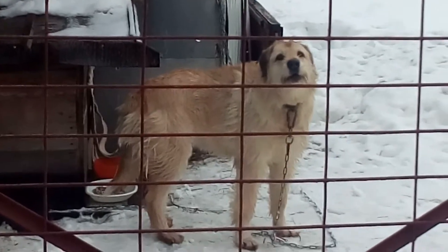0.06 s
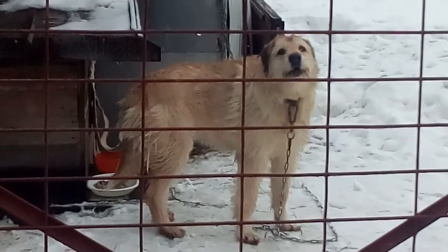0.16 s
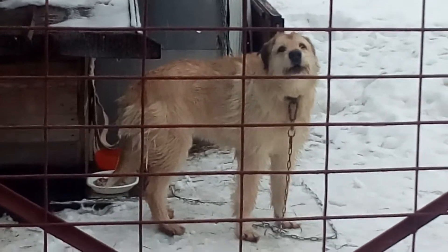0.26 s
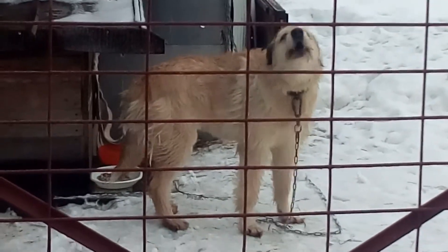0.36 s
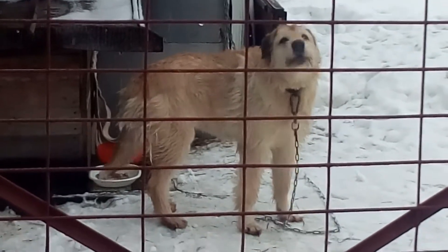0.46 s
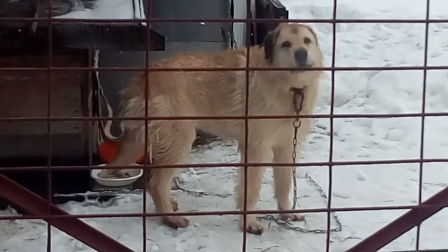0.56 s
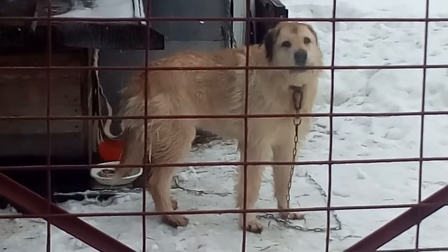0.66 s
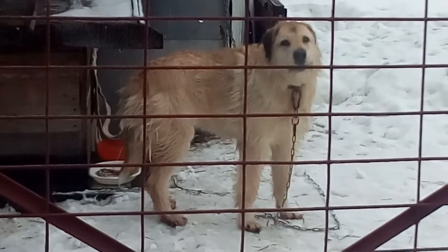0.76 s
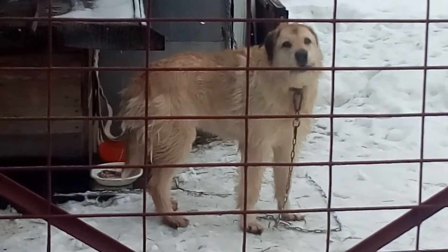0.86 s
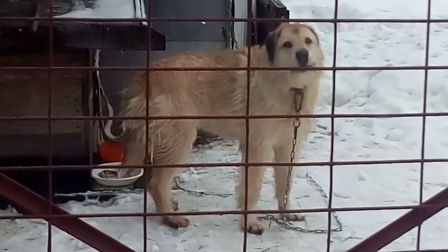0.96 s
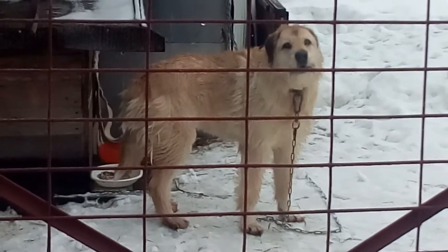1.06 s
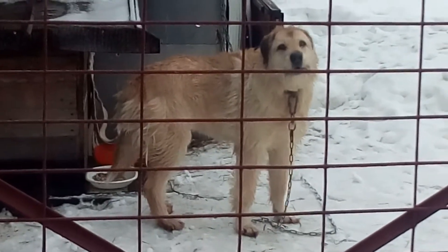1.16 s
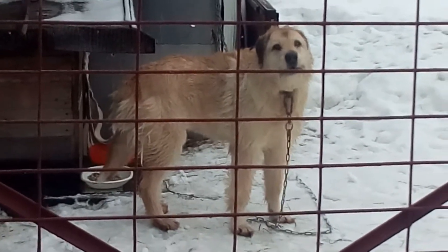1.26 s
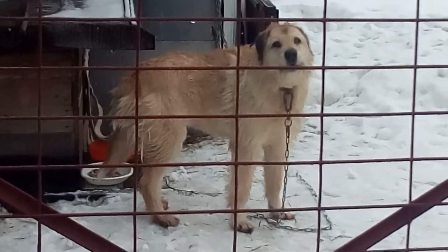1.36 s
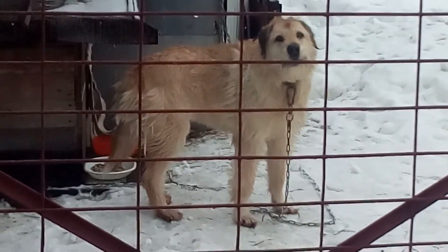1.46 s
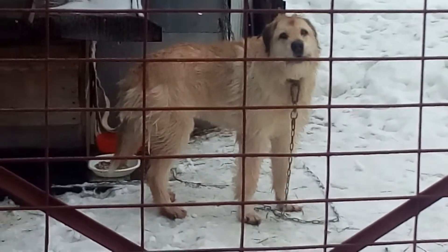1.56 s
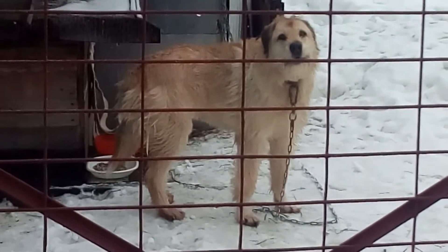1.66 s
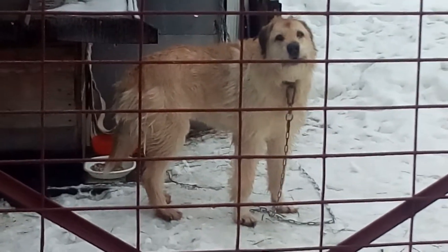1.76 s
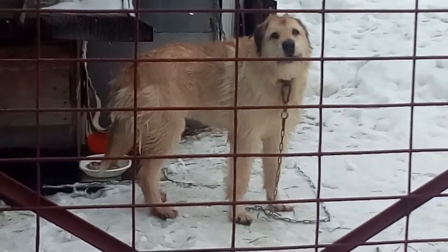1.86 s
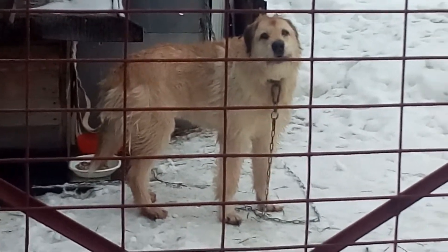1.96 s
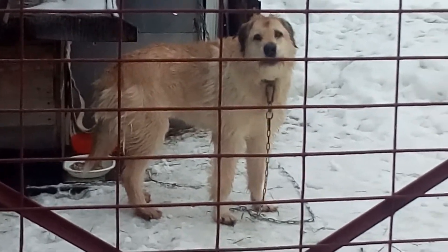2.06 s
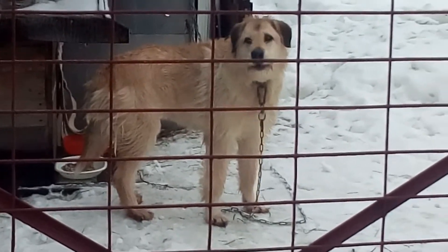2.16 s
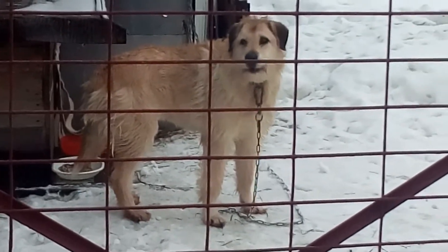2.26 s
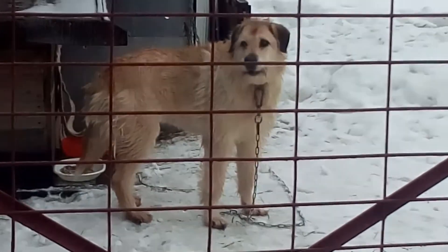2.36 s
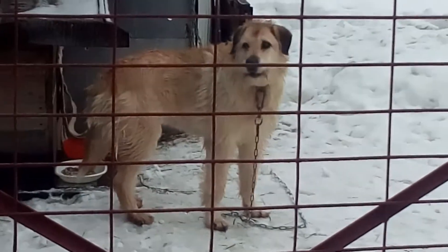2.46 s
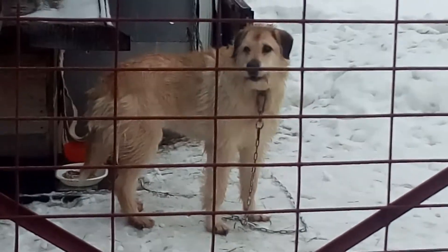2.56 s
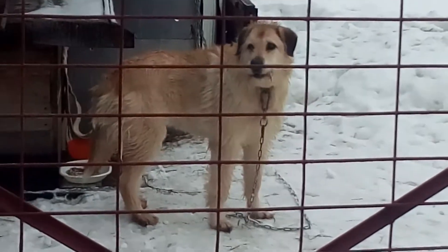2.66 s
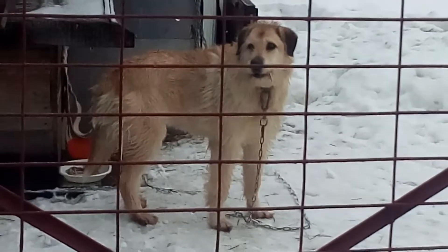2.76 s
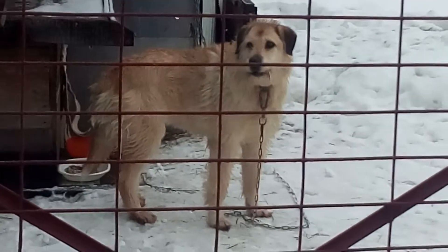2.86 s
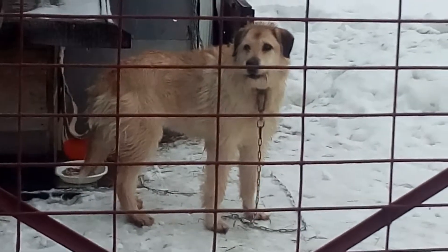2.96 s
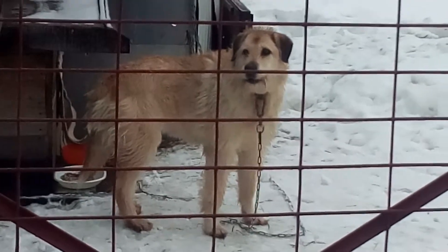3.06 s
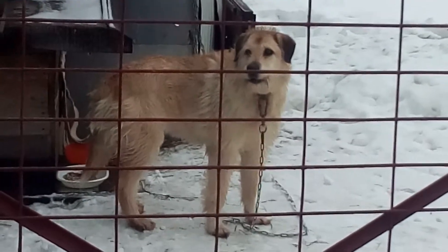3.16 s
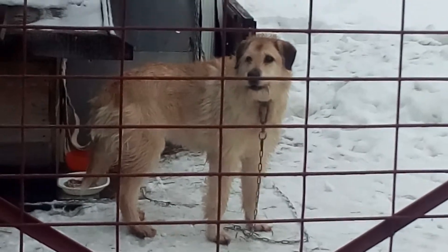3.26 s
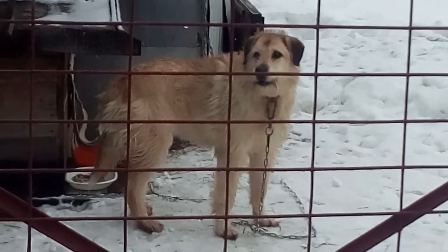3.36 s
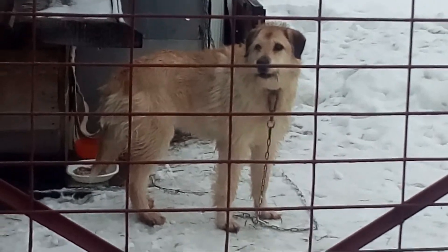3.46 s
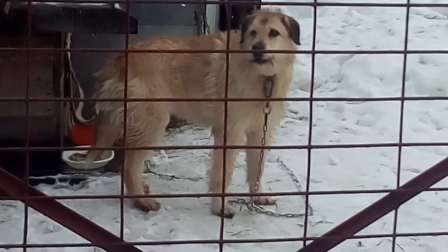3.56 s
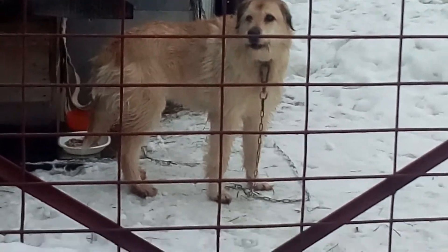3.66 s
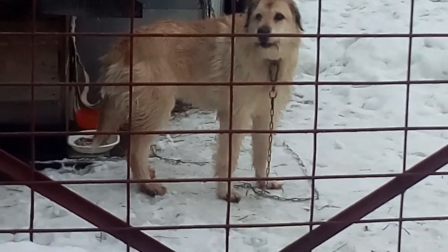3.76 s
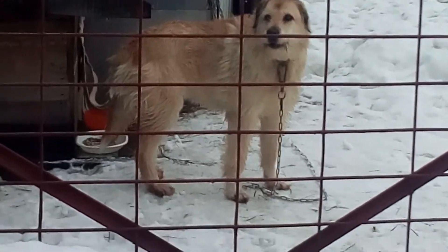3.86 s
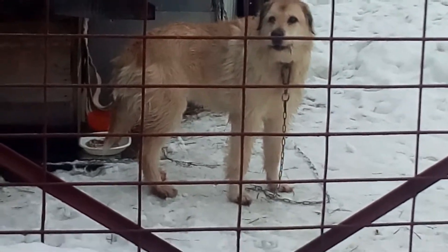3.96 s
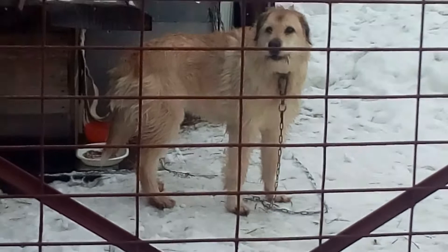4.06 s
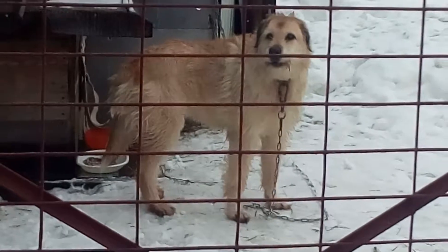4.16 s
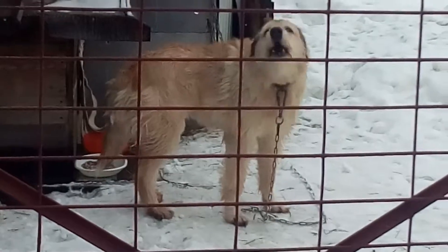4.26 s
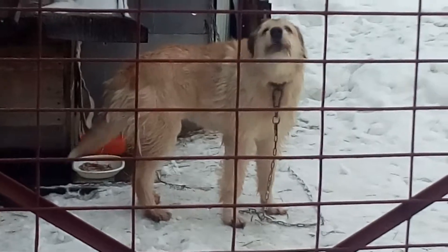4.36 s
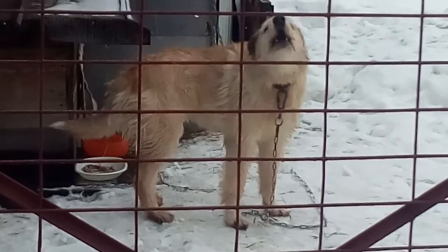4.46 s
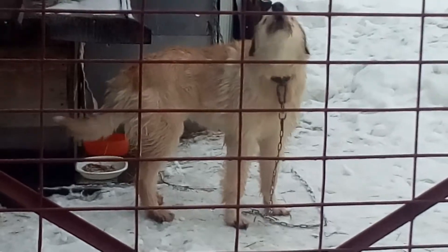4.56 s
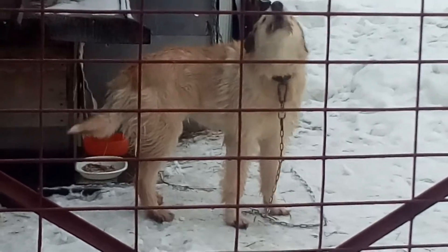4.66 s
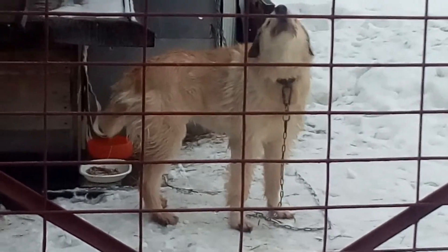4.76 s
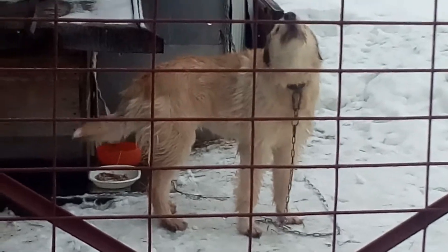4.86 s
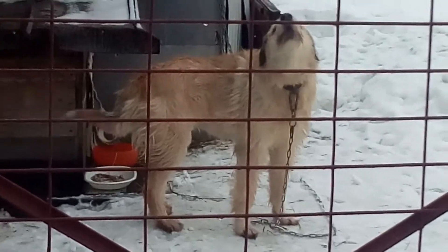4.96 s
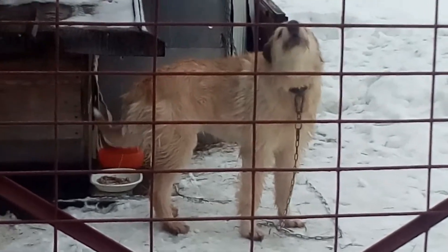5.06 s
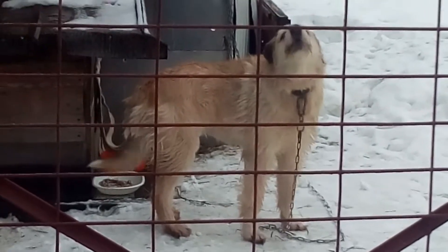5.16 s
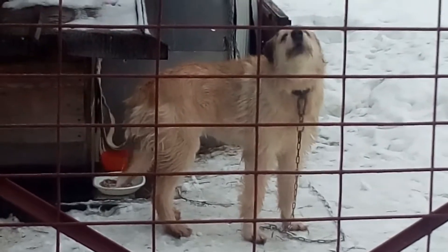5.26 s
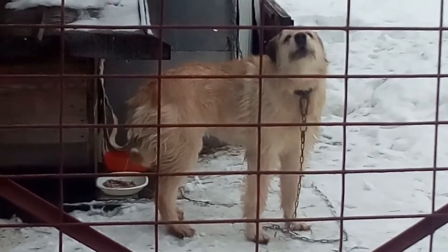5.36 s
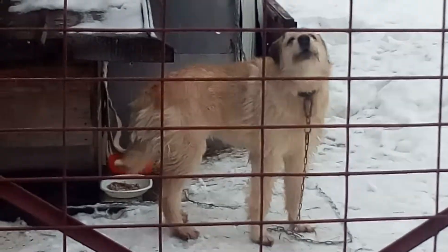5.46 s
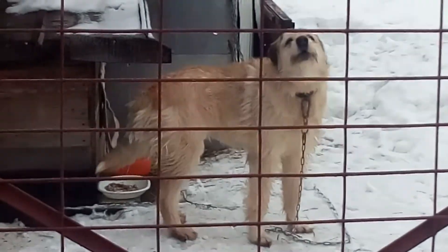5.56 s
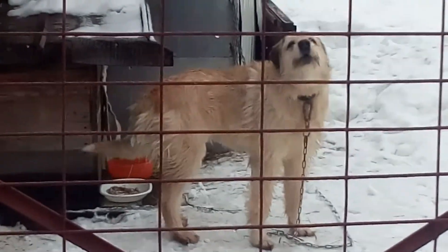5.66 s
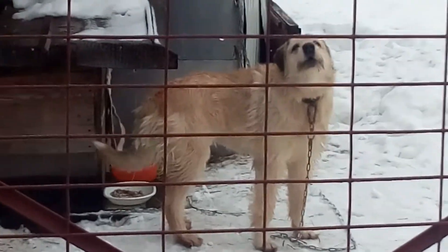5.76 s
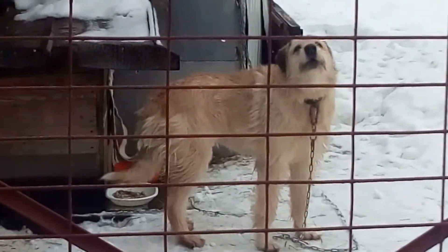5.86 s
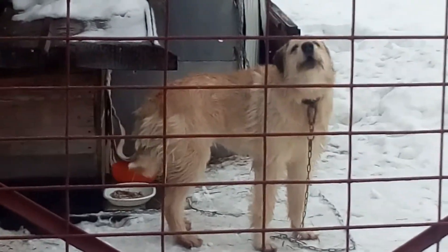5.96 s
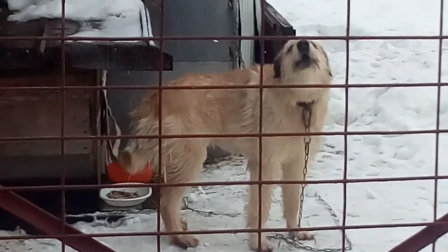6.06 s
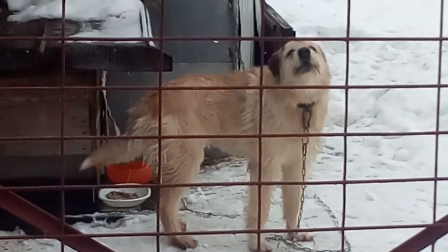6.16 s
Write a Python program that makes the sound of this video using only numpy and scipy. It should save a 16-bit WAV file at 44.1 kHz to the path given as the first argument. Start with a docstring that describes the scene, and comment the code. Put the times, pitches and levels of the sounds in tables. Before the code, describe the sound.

A quiet snowy yard with soft outdoor hush, low wavering rumble and a thin, steady whine around 1.2 kHz. A faint snow step and sparrow chirp come at 0.15 s, then at 0.3 s a large dog gives one short, loud, hoarse bark with a quick yard echo. Sparrows chirp in small clusters, mostly from 0.7 to 1.5 and 2.3 to 3.5 s, over light crunching snow. Very faint chesty grumbles pass at about 1.6 and 2.1 s. At 4.25 s the dog barks hard, and again at 4.5 s, this bark flowing into a howl that wobbles up and down in pitch until 5.0 s, then sinks into a low, rattling closed-mouth growl peaking near 5.3 s and fading. Crisper snow crunches fall at 4.9 and 5.4 s. A softer growl leads to one last sharp bark at 6.0 s, with a brief grumble after it.

```python
"""First comes an outdoor hush with a thin, slightly wavering whine, then a snow step and a chirp.
A big dog barks, grumbles, then barks twice into a wavering howl that sinks to a growl, and barks again.
The dog's voice is a stack of harmonics plus noise; growls are uneven clicks ringing muzzle and chest.
Snow steps are bursts of random grains, sparrows are short gliding whistles, and the whine is one tone.
Hush and low rumble are filtered noise; dying noise makes the echoes."""
import sys
import numpy as np
from scipy import signal
from scipy.fft import rfft, irfft, next_fast_len
from scipy.io import wavfile
from scipy.ndimage import uniform_filter1d

SR = 44100
rng = np.random.default_rng(int(sys.argv[2]) if len(sys.argv) > 2 else 0)


def store_pcm(level_fs):
    """Save levels as 16-bit WAV."""
    pcm = np.round(np.clip(level_fs, -1, 1) * 32767).astype(np.int16)
    wavfile.write(sys.argv[1], SR, np.atleast_2d(pcm).T)


N = 273772   # samples, about 6.2 s

# One bark per row: folds_catch_s, loudest_s, peak_db, swell_time_s, dying_time_s, swell_curve (power),
# dying_curve (power), widest_mouth_after_top_s, start_pitch_hz, top_pitch_hz, end_pitch_hz,
# top_roughness (0-1), top_weak_strong_pulsing (0-1), hiss_loss_db
BARKS = [(0.265, 0.341, -15, 0.0737, .08, 2.4, 3.04, .002, 378.8, 462.2, 365.5, .36, 0.74, 0.61),
         (4.184, 4.257, -13, 0.061, .095, 2.86, 2, 0.0039, 409.5, 457, 367.3, 0.31, 0.92, .3),
         (4.401, 4.495, -15.5, .078, .09, 2.4, 2.4, 0.015, 351.4, 441, 423.8, .42, 1, 0.25),
         (5.943, 6.019, -14, 0.099, .07, 1.8, 1.9, -0.0039, 334.2, 410.8, 346, 0.28, 0.38, 2)]
EDGE_DB = 19.5            # fall of level one swell or dying time from the top
EFFORT_RANGE_DB = 20.5    # effort runs from 0 this far under the peak to 1 at the peak
PITCH_BEND = 1.6          # power of the pitch arch
NARROWEST, WIDEST = 0.63, 0.98            # mouth opening during a bark, 0-1
EASY_ROUGH, EASY_PULSING = .54, 0.22      # roughness and pulsing at no effort
GAPE_S = 0.089            # time from narrowest to widest mouth and back
BARK_HISS_FADE_DB = 9.5   # extra loss of hiss at the narrowest mouth


def bark(onset_s, top_s, db, swell_s, dying_s, swell_bend, dying_bend, gape_lag_s,
         start_hz, top_hz, end_hz, rough, pulsing, muffled_db):
    """Voice controls of one bark: pitch arches, effort sets roughness, the jaw opens and lets hiss out."""
    before = np.linspace(onset_s - top_s, 0, num=20, endpoint=False)
    after = np.linspace(0, 1.3 * dying_s, num=20)
    t = top_s + np.r_[before, after]
    if top_s < HOWL[0][0]:
        t = np.minimum(t, HOWL[0][0] - .004)   # a bark before the howl must end where it begins
    under_db = EDGE_DB * arch(t, top_s, swell_s, dying_s, swell_bend, dying_bend)
    effort = np.clip(1 - under_db / EFFORT_RANGE_DB, 0, 1)
    sag = np.minimum(arch(t, top_s, top_s - onset_s, dying_s, PITCH_BEND, PITCH_BEND), 1)
    pitch = top_hz + sag * (np.where(t < top_s, start_hz, end_hz) - top_hz)
    gape = np.clip(1 - arch(t, top_s + gape_lag_s, GAPE_S, GAPE_S, 2, 2.1), 0, 1)
    opening = NARROWEST + (WIDEST - NARROWEST) * gape
    roughness = EASY_ROUGH + (rough - EASY_ROUGH) * effort ** 2.86
    weak_strong = EASY_PULSING + (pulsing - EASY_PULSING) * effort ** 5.8
    hiss_loss_db = muffled_db + BARK_HISS_FADE_DB * (1 - gape)
    return list(zip(t, pitch, db - under_db, opening, roughness, weak_strong, hiss_loss_db))


# The howl that the third bark runs into, as points along it:
# time_s, pitch_hz, level_db, mouth_opening (0-1), roughness (0-1)
HOWL = [(4.526, 447.6, -13, 0.64, 0.42), (4.549, 416, -18, 0.88, 0.27), (4.569, 369.4, -18, 0.7, .28),
        (4.595, 324, -22.5, 0.83, 0), (4.613, 319.2, -19.5, .55, 0.12), (4.638, 360, -18, 0.67, 0.06),
        (4.679, 409, -14.5, 0.4, .05), (4.704, 409.2, -13.5, 0.48, 0.13), (4.738, 381, -16, 0.35, 0.05),
        (4.767, 355.4, -23, 0.5, .065), (4.793, 329.5, -21.5, 0.6, .05), (4.812, 326.2, -21, 0.45, 0.01),
        (4.86, 351.7, -22.5, 0.6, 0.06), (4.9, 380.3, -18, .5, 0), (4.928, 372.1, -18, .5, 0.03),
        (4.961, 357.8, -25, 0.33, 0.05), (4.976, 334.7, -21.5, 0.63, 0.2), (5.0, 279.7, -30, 0.35, .12),
        (5.029, 221.8, -35.5, 0.35, .12), (5.059, 190.8, -30.5, 0, 0), (5.085, 193.9, -32.5, 0.17, 0.07),
        (5.128, 198.9, -32, 0.11, .07), (5.169, 189, -34.5, 0.14, .12), (5.208, 166.8, -34.5, 0.33, .07),
        (5.232, 149.8, -44, 0.3, 0.2), (5.25, 141, -47, 0.6, 0)]
HOWL_PULSING, HOWL_PULSING_BEND = 5, 1.906   # weak-strong pulsing grows as a power of roughness
HOWL_FULL_DB, HOWL_HISS_FADE = -12, 0.48     # full voice level; extra loss of hiss per dB under it


def howl():
    """Voice controls of the howl: rougher folds pulse more unevenly, and a softer voice hisses less."""
    rows = []
    for row in HOWL:
        level_db, rough = row[2], row[4]
        pulsing = HOWL_PULSING * max(rough, 0) ** HOWL_PULSING_BEND
        hiss_loss_db = HOWL_HISS_FADE * (HOWL_FULL_DB - level_db)
        rows.append((*row, pulsing, hiss_loss_db))
    return rows


# about the level of hiss against the voice, mouth wide open; its fall as the opening shrinks
HISS_OPEN_DB, HISS_DB_PER_DECADE = -19.5, 14
HEAD_UP_S = 5.6   # from here the muzzle points at the sky


def voice():
    """Barks and howl share one throat: vocal folds make the tone, rushing air makes the hiss."""
    columns, gate = in_time([bark(*row) for row in BARKS] + [howl()])
    on = gate > 0
    pitch, level_db, opening, rough, pulsing, muffled_db = (c[on] for c in columns)
    pitch = uniform_filter1d(pitch, size=700)      # the larynx glides without corners
    opening, rough, pulsing = (np.clip(c, 0, 1) for c in (opening, rough, pulsing))
    hiss_db = HISS_OPEN_DB + HISS_DB_PER_DECADE * np.log10(opening + .01) - muffled_db
    # opening blends neighbouring mouth shapes: shut, narrow, open
    shut, narrow, wide = [np.maximum(1 - 2 * np.abs(opening - k / 2), 0) for k in range(3)]
    raised = np.flatnonzero(on) > HEAD_UP_S * SR
    shares = [shut, narrow, wide * ~raised, wide * raised]
    phase = 2 * np.pi * np.cumsum(pitch * (1 + .09 * rough * drift(71.5)[on])) / SR   # uneven cycle lengths
    throat, hiss = np.zeros(N), np.zeros((2, N))
    throat[on] = from_db(level_db) * fold_sound(on, phase, pitch, rough, pulsing, shares)
    hiss[:, on] = from_db(level_db + hiss_db) * breath_sound(on, phase, pitch, opening, wide)
    return throat * gate, hiss * gate


# Throat and mouth colour for four mouth shapes: frequency_hz, level_db (relative)
MOUTH_SHUT = [(120, -13.5), (200, -17.5), (350, 1.5), (600, -0.5), (800, -25), (1000, -3), (1200, -35),
              (1500, -74), (1850, -22), (2300, -80), (2900, -24), (3600, -47.5)]
# narrow mouth: frequency_hz, level_db (relative)
MOUTH_NARROW = [(120, -54.5), (200, -29.5), (330, 0), (500, -6.5), (760, -2.5), (1070, -18.5), (1250, -24),
                (1500, -51.5), (1680, -24), (1890, -24), (2050, -44.5), (2330, -65), (3600, -54)]
# open mouth: frequency_hz, level_db (relative)
MOUTH_OPEN = [(120, -60.5), (300, 2), (450, 3.5), (600, 1), (880, 1), (1070, -6), (1350, 3), (1600, -19),
              (2130, -6), (2560, -34), (2930, -21.5), (3600, -51)]
# open mouth with the head raised: frequency_hz, level_db (relative)
MOUTH_RAISED = [(120, -46), (300, -6.5), (410, -6.5), (600, -1.5), (800, -3.5), (1020, -10.5), (1220, -9.5),
                (1550, -35.5), (1900, -22.5), (2150, -41), (2380, -28.5), (2700, -71)]


def fold_sound(on, phase, pitch, rough, pulsing, shares):
    """Vocal fold harmonics and the lines halfway between, roughened by noise in the same throat."""
    mouths = MOUTH_SHUT, MOUTH_NARROW, MOUTH_OPEN, MOUTH_RAISED
    tone, power = 0, 0
    for k in np.arange(1, 33) / 2:
        gain = from_db(sum(share * at_hz(mouth, k * pitch) for share, mouth in zip(shares, mouths)))
        if k % 1:
            gain = gain * pulsing   # alternating strong and weak pulses give lines halfway
        wander = 2.7 * rough * drift(35)[on]   # each partial slips in phase on its own: a hoarse wave
        tone = tone + gain * np.sin(k * phase - .4 * k ** 2 + wander)
        power = power + gain ** 2 / 2
    tone = tone / np.sqrt(power) * from_db(2.5 * rough * drift(90)[on])   # uneven pulse strength
    rasp = 0
    for share, mouth in zip(shares, mouths):
        noise = colour(rng.standard_normal(N), mouth)
        rasp = rasp + np.sqrt(share) * rms_one(noise)[on]
    return np.sqrt(1 - rough ** 2) * tone + rough * rasp


# Upper throat resonances: frequency_hz, width_hz (first of two passes; the second is twice as wide),
# level_db (relative)
BREATH = [(2906, 72, 2), (3800, 99, -15), (4675, 97, -0.5), (5410, 297, 3.5), (5666, 260, -5),
          (6200, 310, -5.5), (6610, 220, -1.5), (7370, 260, -8)]
# Extra treble hiss of a wide open mouth: frequency_hz, level_db (relative)
BREATH_TOP = [(6000, -34.5), (8800, 14.5), (10000, 7), (11500, 3.5), (13500, 3), (15300, 14.5)]


def breath_sound(on, phase, pitch, opening, wide_share):
    """Air rushing through the throat hisses at its resonances, in puffs that follow the folds."""
    edge = np.zeros(N)      # the sharp closing of the folds carries harmonics into the treble
    edge[on] = sum(np.sin(k * phase + 0.33 * k ** 2) * (k * pitch < 9000) for k in range(6, 30))
    air = rng.standard_normal((3, N))
    drive = np.array([air[0] + .17 * edge, air[1]])
    breath = 0
    for k, (hz, width_hz, db) in enumerate(BREATH):
        ringing = resonate(resonate(drive, hz, width_hz), hz, 2 * width_hz)
        breath = breath + (-1) ** k * from_db(db) * ringing
    # a gaping mouth blurs the resonances; a side pocket of the throat leaves a dip
    blurred = resonate(resonate(air[:2], 5030, 1300), 5450, 1780)
    blurred = rms_one((blurred - 0.95 * resonate(blurred, 3200, 900))[:, on])
    gape = .6 * wide_share
    breath = np.sqrt(1 - gape) * rms_one(breath[:, on]) + np.sqrt(gape) * blurred
    top = from_db(-12.0) * opening ** 2.3 * rms_one(colour(air[2], BREATH_TOP))[on]
    puffs = 1 + .4 * np.cos(phase)       # air escapes once a cycle
    puffs = puffs * from_db(2.4 * drift(48)[on])
    middle, apart = breath
    return puffs * (middle + top + 0.35 * apart * [[1], [-1]])


# Growls through the closed muzzle: start_s, loudest_s, end_s, swell_curve (power), level_db,
# upper_resonances_db (against the level), chest_db (against the level)
GROWL = [(1.4, 1.592, 1.78, 1.1, -57.5, -8, -0.5), (1.9, 2.106, 2.3, 1.7, -54, -12, 1.5),
         (5.158, 5.284, 5.7, 3.58, -39.5, -7, -6), (5.665, 5.863, 6.0, 5.6, -48, -16, -11),
         (6.08, 6.139, 6.23, 3.3, -48, -7, -5)]
# Muzzle resonances: frequency_hz, width_hz (first of two passes; the second is three times as wide),
# level_db (relative among the upper ones; unused for the first)
MUZZLE = [(320.5, 42, 0), (671.4, 53, -4.5), (1000, 39, -14), (2953, 42, -46)]
# Chest colour: frequency_hz, level_db (relative)
CHEST = [(60, -28), (110, -4.5), (230, 12.5), (330, 3), (480, 8), (620, 1.5), (900, -51.5), (3000, -72)]
GROWL_PULSES_PER_S, GROWL_UNEVEN = 69, .45   # typical pace; its spread on a natural-log scale
GROWL_EDGE_DB = 15   # fall of level at either end
GROWL_DULLING = 1    # extra fall of the upper resonances per dB of fading


def growl():
    """Slow uneven fold slaps and air ring the closed muzzle and, broadly, the chest."""
    t, swell = np.arange(N) / SR, np.zeros((3, N))
    for start, top, end, bend, db, upper_db, chest_db in GROWL:
        under_db = GROWL_EDGE_DB * arch(t, top, top - start, end - top, bend, bend)
        fading_db = under_db * [[1], [1 + GROWL_DULLING], [1]]
        swell += from_db(db - fading_db + [[0], [upper_db], [chest_db]])
    cycles = np.cumsum(GROWL_PULSES_PER_S * np.exp(GROWL_UNEVEN * drift(40))) / SR
    slaps = np.diff(np.floor(cycles), prepend=0) * from_db(1.0 * rng.standard_normal(N))
    slaps = slaps + 0.039 * rng.standard_normal(N)   # air
    (hz, width_hz, _), *uppers = MUZZLE
    low = rms_one(resonate(resonate(slaps, hz, width_hz), hz, 3 * width_hz))
    high = rms_one(sum(from_db(db) * resonate(resonate(slaps, hz, w), hz, 3 * w) for hz, w, db in uppers))
    chest = rms_one(colour(slaps, CHEST))
    return swell[0] * low + swell[1] * high + swell[2] * chest


# Left-right balance of the dog: frequency_hz, left_minus_right_db
DOG_BALANCE = [(60, 4.5), (130, 0), (290, 3), (640, 0.5), (1410, 4), (3100, -7.5), (6820, 0), (15000, 0.5)]
YARD_T60_S, YARD_DB = 0.31, -18.5   # time for yard echoes to fall 60 dB; their level against the dog


def dog():
    """The dog's sound spreads ahead, bounces off a near wall and scatters around the yard."""
    throat, hiss = voice()
    body = throat + growl() + hiss
    ahead = np.array([colour(side, [(hz, sign * db / 2) for hz, db in DOG_BALANCE])
                      for side, sign in zip(body, (1, -1))])
    # a near wall throws the upper mids back, with opposite sign in the two channels
    bounce = resonate(np.roll(throat, int(0.00347 * SR)), 2100, 900)
    wall = bounce * from_db(-7.0) * [[1], [-1]]
    return ahead + wall + from_db(YARD_DB) * tail(body.mean(0), YARD_T60_S, 200, 6400)


# Sparrow chirps: start_s, length_s, start_pitch_hz, end_pitch_hz, level_db, warble_hz
CHIRPS = [(0.168, 0.052, 2920, 2950, -67, 60), (0.686, 0.068, 4920, 4830, -69, 98),
          (0.779, 0.019, 3980, 4610, -64, 60.3), (0.821, .04, 5120, 4870, -66, 60),
          (0.92, 0.038, 4180, 4430, -66, 400), (2.316, 0.074, 4700, 4280, -68.5, 304),
          (2.654, 0.06, 6380, 4370, -67.5, 40), (5.189, 0.051, 3610, 4020, -65.5, 293),
          (0.204, 0.034, 5150, 5110, -63, 200), (0.735, 0.037, 3410, 2550, -56.5, 100),
          (.949, 0.034, 3490, 2960, -63.5, 297), (1.062, 0.016, 3220, 3080, -63, 200),
          (1.121, 0.046, 3230, 3910, -60, 403), (1.17, 0.012, 4340, 5130, -63, 60.4),
          (1.201, 0.027, 4040, 3900, -55.5, 304), (1.263, 0.054, 3890, 4240, -56.5, 500),
          (1.312, 0.053, 3265, 3040, -59, 98.5), (1.366, 0.051, 3970, 3160, -65, 402),
          (1.484, 0.018, 4230, 3940, -60.5, 303), (2.405, 0.015, 5010, 4630, -56, 59.7),
          (2.489, 0.02, 2785, 2600, -60.5, 80.6), (2.523, 0.047, 5200, 5300, -65, 294),
          (2.562, 0.031, 3360, 3180, -62, 60.2), (2.721, 0.03, 4120, 4550, -59.5, 79),
          (2.734, 0.027, 3330, 2610, -61.5, 59.4), (2.752, 0.04, 4180, 3140, -60.5, 300),
          (2.994, .04, 3990, 3600, -61, 295), (3.066, .1, 3740, 3760, -65.5, 149),
          (3.206, 0.04, 3830, 3550, -65, 297), (3.456, 0.019, 4360, 4270, -58.5, 150),
          (3.985, 0.016, 3520, 4370, -68, 39.7), (4.141, 0.088, 4100, 3890, -63, 60),
          (5.316, 0.023, 4400, 3985, -63.5, 200), (5.494, 0.031, 2880, 3095, -58, 60),
          (5.828, 0.044, 3880, 3860, -64, 299.8)]
# Faint chatter of farther sparrows: time_s, level_db (each note adds its own -8 to 4 dB)
FLOCK = [(0.0, -79.5), (6.21, -76.5)]


def sparrows():
    """Near chirps over a random chatter of fainter ones, all blurred by distance."""
    near, far = np.zeros((2, N + SR))
    flutter = np.tile(drift(172), 2)
    for s, length, start_hz, end_hz, db, warble_hz in CHIRPS:
        note = whistle(length, start_hz, end_hz, warble_hz * flutter[int(s * SR):])
        near[int(s * SR):][:len(note)] += from_db(db) * note
    for when, span, height, slide, size in rng.random((320, 5)):
        hz = 2500 + 2900 * height
        warble = 350 * flutter[int(size * N):]
        note = whistle(0.0141 + 0.092 * span, hz, hz + 1400 * (slide - .6), warble)
        far[int(when * N):][:len(note)] += from_db(12 * size - 8) * note
    (flock_db,), _ = in_time([FLOCK])
    birds = near[:N] + far[:N] * from_db(flock_db)
    return right_first(birds, left_louder_db=7.0) + from_db(2.5) * tail(birds, 0.19, 1500, 6300)


def whistle(length, start_hz, end_hz, warble):
    """One gliding note, frayed by an uneven warble in Hz."""
    t = np.arange(int(length * SR)) / SR
    hz = start_hz + (end_hz - start_hz) * t / length + warble[:len(t)]
    return np.sin(np.pi * t / length) ** 0.68 * np.sin(2 * np.pi * np.cumsum(hz) / SR)


# Steps in crusty snow: start_s, level_db, duller_part_db (against the level), weight_sinks_for_s
STEPS = [(0.141, -64.5, 4.5, 0.047), (0.6727, -70, 4, 0.11), (0.9273, -72.5, -8, 0.1),
         (1.0294, -77, 7, 0.23), (1.284, -71, 6, 0.068), (1.48, -71, -3, 0.1), (1.5454, -79.5, 10.5, 0.13),
         (1.8294, -67.5, 5, 0.044), (2.0294, -71.5, 6.5, 0.062), (2.3381, -75, 9.5, 0.092),
         (2.488, -68.5, 6.5, 0.052), (2.7194, -77, 9, .17), (2.869, -80.5, 13, .08), (3.006, -67, 4, 0.032),
         (3.199, -74.5, 2, .045), (3.3892, -70.5, 5.5, 0.079), (3.465, -70, 3, 0.037),
         (3.8594, -79, 4.5, .1), (3.935, -62, 4, 0.028), (4.9284, -56, 2.2, .08), (5.3474, -62, 0, 0.088),
         (5.423, -60, 1.5, 0.063), (5.91, -60.5, 7, 0.035), (6.09, -71, 9.5, 0.044)]
# Bright part of the crunch: frequency_hz, level_db (relative)
CRUNCH_BRIGHT = [(3000, -33), (4300, -8.5), (5500, 11), (7000, -2), (8200, -15), (13000, -31), (15500, -19)]
# Dull part of the crunch: frequency_hz, level_db (relative)
CRUNCH_DULL = [(600, -11.5), (1500, -4.5), (2300, -8.5), (3400, 1), (4800, -26.5)]
STEP_T60_S = 0.21   # time to fall 60 dB once the weight has sunk


def steps():
    """Each footfall breaks the crust in a dense burst of grains while the weight sinks in."""
    t, swell = np.arange(N) / SR, np.zeros((2, N))
    for s, db, dull_db, sink in STEPS:
        since = np.maximum(t - s, 0)
        dying_db = 60 * np.maximum(since - sink, 0) / STEP_T60_S
        shape = from_db(db - dying_db) * (1 - np.exp(-since / 0.002))
        swell += shape * from_db([[0], [dull_db]])
    grains = rng.random((2, N)) < 6000 / SR   # about 6000 grains a second
    grains = grains * rng.choice([-1, 1], (2, N)) * from_db(1.71 * rng.exponential(1, (2, N)))
    bright = rms_one(colour(grains, CRUNCH_BRIGHT)) * swell[0]
    dull = rms_one(colour(grains, CRUNCH_DULL)) * swell[1]
    near, apart = bright + dull
    near = near * from_db(2.5 * drift(30))   # the crust gives way in fits
    return right_first(near, left_louder_db=3.0) + .45 * apart * [[1], [-1]]


# Level of the whine: time_s, level_db (wavers around this)
WHINE = [(0, -63), (.88, -63.5), (1.9, -71.5), (2.2, -69.5), (2.57, -71.5), (2.78, -65.5), (4.1, -63.5),
         (5.3, -60), (6.21, -58)]
WHINE_HZ = 1247.4   # centre of a slight waver


def whine():
    """A thin tone whose pitch and level waver slightly, around a slowly changing level."""
    (level_db,), _ = in_time([WHINE])
    phase = 2 * np.pi * np.cumsum(WHINE_HZ + 1.6 * drift(2.4)) / SR
    return np.sqrt(2) * from_db(level_db + 2.0 * drift(6.6)) * np.sin(phase + [[0], [.4]])


# Colour of the outdoor hush: frequency_hz, level_db (relative, per Hz)
HUSH = [(18, -57), (32, -19.5), (60, -1), (108, 0), (284, -7.5), (546, -12.5), (800, -12.5), (1400, -17),
        (3600, -23.5), (6900, -31.5), (10500, -43.5), (13600, -46), (15500, -46.5)]
# Level of the low outdoor rumble: time_s, level_db (wavers; left 0.7 dB up, right 0.7 dB down)
RUMBLE = [(0, -62), (.6, -64), (.78, -60), (.95, -64), (1.8, -64), (2.15, -60), (2.5, -64), (3.9, -67),
          (4.3, -59), (4.9, -58), (5.5, -60), (6.21, -60)]
# How alike the two sides are: frequency_hz, likeness (0 unrelated, 1 identical)
LIKENESS = [(60, 0.63), (250, 0.71), (640, 0.4), (1400, 0), (3000, 0), (7000, 0.07)]
HUSH_DB = -59.5   # level around which the hush wavers, counted before its bass is taken out


def hush():
    """Wide outdoor noise, more alike on both sides in the bass, with a separate low rumble under it."""
    mid, side = rng.standard_normal((2, N))
    mid = colour(mid, [(hz, 10 * np.log10(1 + np.clip(c, 0, .95))) for hz, c in LIKENESS])
    side = colour(side, [(hz, 10 * np.log10(1 - np.clip(c, 0, .95))) for hz, c in LIKENESS])
    air = rms_one(colour(np.array([mid + side, mid - side]), HUSH))
    (rumble_db,), _ = in_time([RUMBLE])
    bass = signal.sosfilt(signal.butter(2, 220, fs=SR, output="sos"), air)
    rumble = rms_one(bass) * from_db(rumble_db + 1.5 * drift(6)) * from_db([[.7], [-.7]])
    return from_db(HUSH_DB + 1.0 * drift(3.7)) * (air - bass) + rumble


def from_db(db):
    """Decibels to gain."""
    return 10 ** (np.asarray(db) / 20)


def rms_one(x):
    """Scale to an average strength (rms) of 1."""
    return x / np.sqrt(np.mean(x ** 2) + 1e-20)


def arch(t, top_s, rise_s, fall_s, rise_bend, fall_bend):
    """Distance from the top of a swell, 1 at one rise or fall time away."""
    away = np.abs(t - top_s)
    return np.where(t < top_s, (away / rise_s) ** rise_bend, (away / fall_s) ** fall_bend)


def in_time(tables):
    """Columns of several curves at every sample, and a soft gate that is open while any of them lasts."""
    t = np.arange(N) / SR
    rows = np.array(sorted(row for table in tables for row in table))
    gate = sum((t > table[0][0] + .002) & (t < table[-1][0] + .012) for table in tables) > 0
    return [np.interp(t, rows[:, 0], c) for c in rows.T[1:]], uniform_filter1d(gate * 1., size=300)


def at_hz(points, hz):
    """Read a spectrum on a log-frequency axis."""
    return np.interp(np.log(hz), np.log(np.array(points)[:, 0]), np.array(points)[:, 1])


def colour(x, points):
    """Filter by a spectrum in dB."""
    size = next_fast_len(N)
    hz = np.maximum(np.arange(size // 2 + 1) * SR / size, 1)
    return irfft(rfft(x, size) * from_db(at_hz(points, hz)), size)[..., :N]


def drift(rate):
    """Slow chance: noise twice through a one-pole low-pass at this rate in Hz; spread 1."""
    r = np.exp(-2 * np.pi * rate / SR)
    return rms_one(signal.lfilter([1], [1, -2 * r, r * r], rng.standard_normal(N + SR))[SR:])


def resonate(x, hz, width_hz):
    """Two-pole resonance, gain about 1 on top."""
    r = np.exp(-np.pi * width_hz / SR)
    poles = [1, -2 * r * np.cos(2 * np.pi * hz / SR), r * r]
    return signal.lfilter(np.array([1, 0, -1]) * (1 - r * r) / 2, poles, x)


def tail(x, t60, low_hz, high_hz):
    """Scattered echoes from walls and fence: a dying noise response for each side, mean energy 1."""
    t = np.arange(int(t60 * SR)) / SR
    echo = rng.standard_normal((2, SR))[:, :len(t)] * from_db(-60 * t / t60) * np.minimum(t / 0.002, 1)
    echo = signal.sosfilt(signal.butter(1, [low_hz, high_hz], "band", fs=SR, output="sos"), echo)
    return signal.fftconvolve(x[None], rms_one(echo) / np.sqrt(len(t)), axes=1)[:, :N]


RIGHT_LEAD = 20   # samples by which the right channel comes first


def right_first(x, left_louder_db):
    """Two channels from one sound: the right comes first, the left comes later but louder."""
    return np.array([np.roll(x, RIGHT_LEAD) * from_db(left_louder_db / 2), x * from_db(-left_louder_db / 2)])


def scene():
    """Dog ahead with yard echoes; birds, steps, whine and hush around."""
    return dog() + sparrows() + steps() + whine() + hush()


CUTOFF_HZ = 15950   # above this the treble is removed


def record(dry):
    """Loud peaks are rounded off, then the top of the treble is cut steeply."""
    rounded = 0.66 * np.tanh(dry / 0.72)
    return signal.sosfilt(signal.cheby2(16, 80, CUTOFF_HZ, fs=SR, output="sos"), rounded)


dry = scene()
out = record(dry)
store_pcm(out)
```